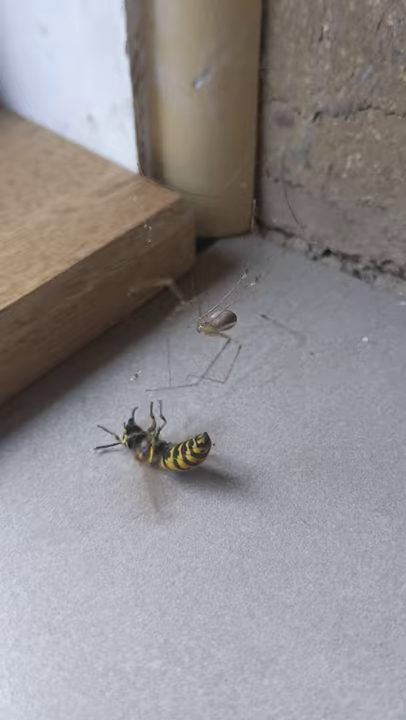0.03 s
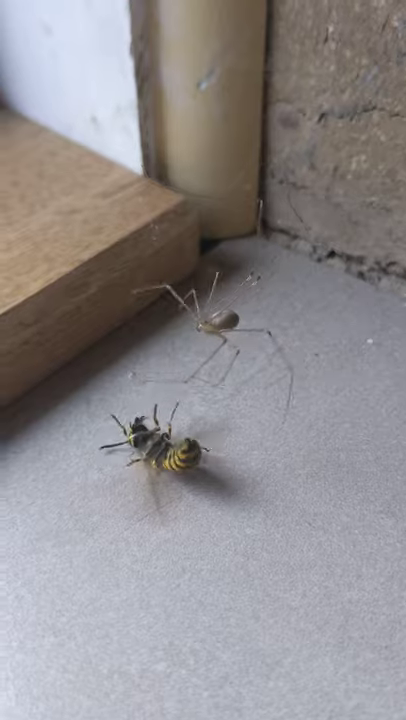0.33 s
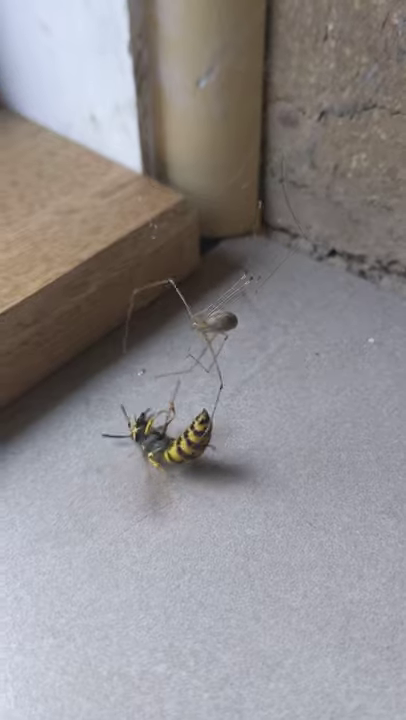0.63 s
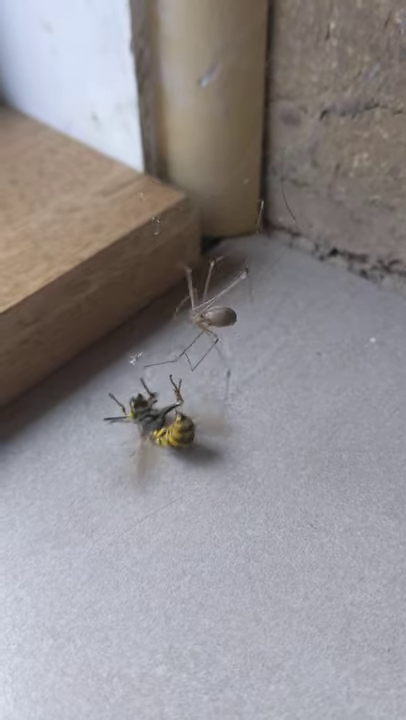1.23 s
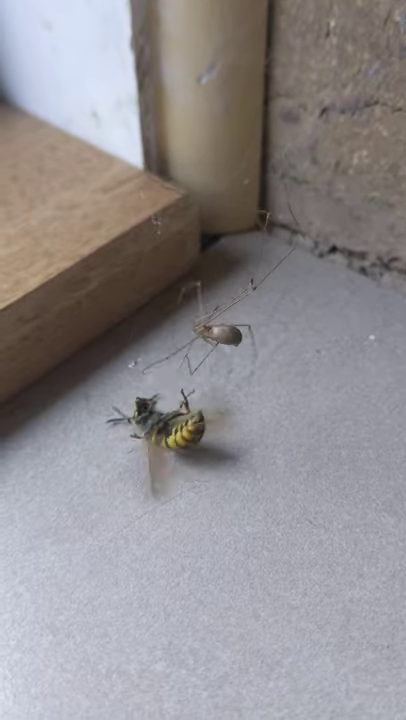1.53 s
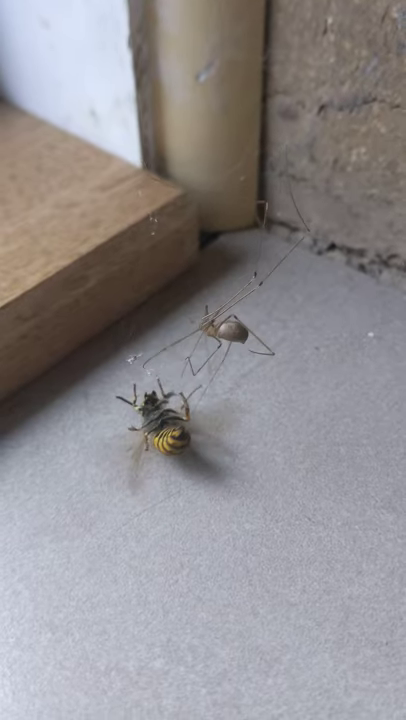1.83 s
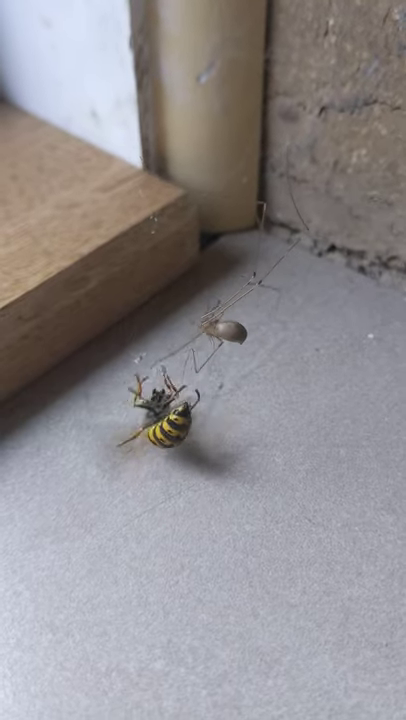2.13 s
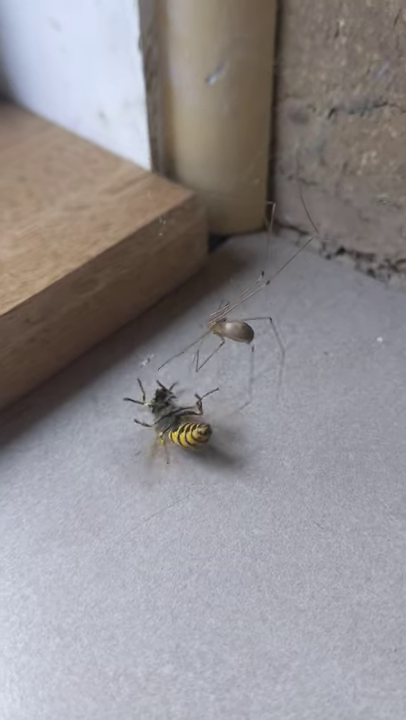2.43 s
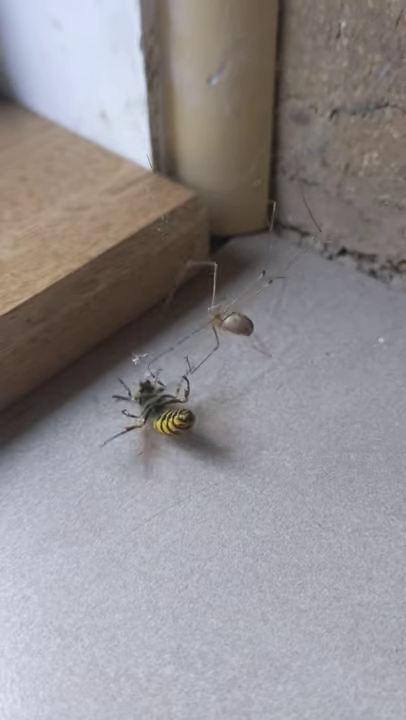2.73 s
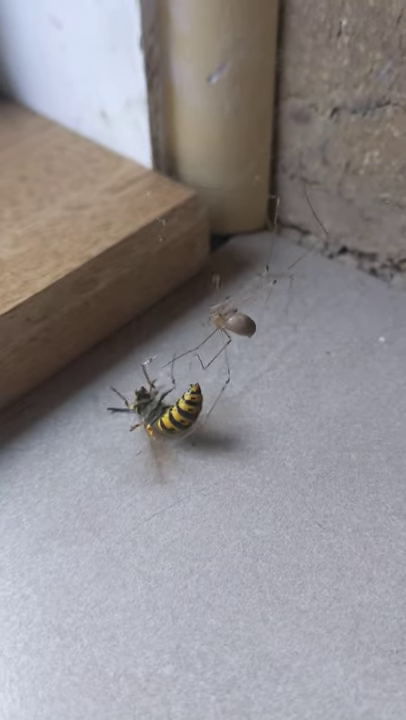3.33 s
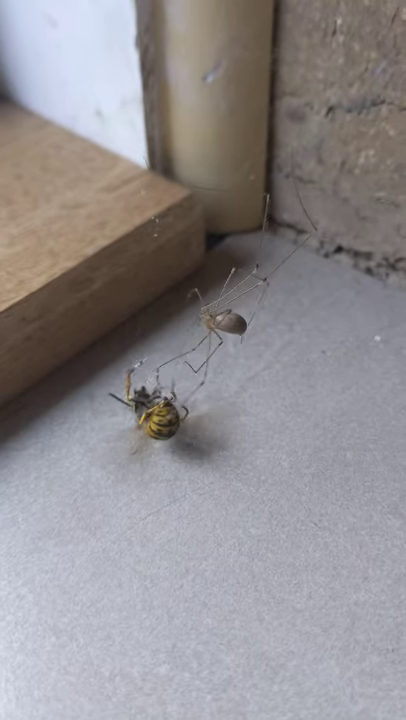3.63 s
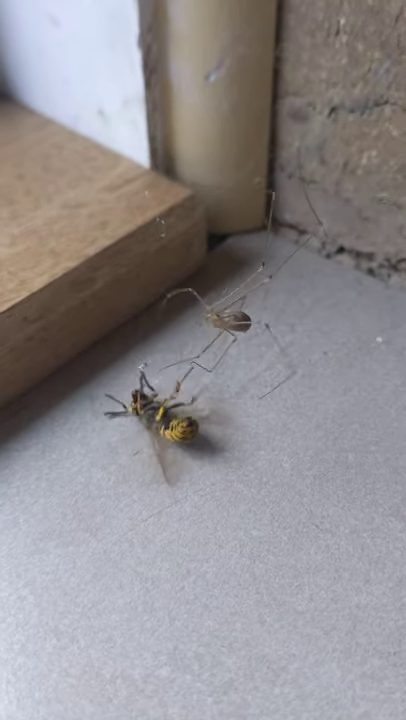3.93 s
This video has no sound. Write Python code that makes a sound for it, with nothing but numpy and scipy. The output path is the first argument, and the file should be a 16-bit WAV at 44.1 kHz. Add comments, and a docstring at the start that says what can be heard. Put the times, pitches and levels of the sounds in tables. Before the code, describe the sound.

A wasp's wings buzz and rattle dryly against a hard floor, close up.

```python
"""A wasp on its back on a hard floor, caught in a spider's threads, beats its wings in fits.
Each beat slaps and scuffs the floor, with a lighter touch on the way back: a dry, gritty rattle
whose colour shifts as the wasp twists. The struck wing rings, the body knocks and rubs,
and puffs of air add a soft low flutter. It is heard close up, in the corner of a quiet room
with a low rumble, a hum and a faint fading hiss."""
import sys
import numpy as np
from scipy import signal
from scipy.fft import rfft, irfft
from scipy.io import wavfile

SR = 44100
rng = np.random.default_rng(int(sys.argv[2]) if len(sys.argv) > 2 else 0)


def wav_record(signal):
    """Record a signal, one row per channel, as 16-bit PCM in the file named by sys.argv[1]."""
    frames = np.transpose(np.atleast_2d(signal))
    bounded = np.clip(frames, -1, 1)
    # unit amplitude maps onto the largest positive 16-bit level
    quanta = np.round(bounded * 32767).astype(np.int16)
    wavfile.write(sys.argv[1], SR, quanta)


N = 176400
T = np.arange(N) / SR

# Speed of the wingbeat: time_s, rate_hz
BEAT_RATE = [(0.0, 56), (0.02, 47.02), (0.099, 78.99), (0.269, 47.62), (0.319, 66.86), (0.348, 72.74),
             (0.458, 68.65), (0.537, 58.93), (0.617, 72.48), (0.657, 73.15), (0.706, 63.98), (0.816, 72.12),
             (1.105, 74.36), (1.144, 77.39), (1.224, 74.95), (1.333, 79.71), (1.483, 65.75), (1.592, 57.54),
             (1.642, 47.56), (1.701, 66.56), (1.771, 58.44), (1.871, 69.15), (1.92, 65.4), (1.98, 69.09),
             (2.08, 66.51), (2.149, 58.76), (2.199, 68.4), (2.309, 60.66), (2.388, 67.91), (2.438, 60.2),
             (2.567, 68.75), (2.677, 59.0), (2.736, 70.88), (2.945, 49.51), (3.114, 47.63), (3.154, 52.7),
             (3.214, 46.41), (3.274, 64.94), (3.403, 55.68), (3.592, 63.77), (3.721, 52.84), (3.791, 61.67),
             (3.821, 67.09), (4.0, 48.9)]
# How hard the wings hit the floor: time_s, level_db
BEAT_FORCE = [(0.0, -53.5), (0.05, -38), (0.135, -34), (0.226, -58), (0.27, -62), (0.31, -41.5),
              (0.39, -34.5), (0.442, -36), (0.496, -42), (0.551, -41), (0.595, -37.5), (0.841, -37.5),
              (0.929, -35), (1.081, -34), (1.179, -30), (1.285, -31.5), (1.479, -37), (1.63, -36.5),
              (1.76, -39), (1.96, -35.5), (2.2, -35), (2.275, -33), (2.34, -36.5), (2.561, -33),
              (2.619, -35), (2.87, -32.5), (3.09, -39.5), (3.189, -33.5), (3.307, -38), (3.321, -33.5),
              (3.504, -34.5), (4.0, -34)]
# Back stroke against the slap: time_s, gain_db
BACK_STROKE_LEVEL = [(1.3, -9.5), (1.98, -6), (2.3, -8.5), (3.5, -13)]
# Colour of the rattle on each side: frequency_hz, gain_db
RATTLE_EQ_LEFT = [(300, -49), (1000, -4), (1550, -16), (2500, -25.5), (4000, -18), (4650, -10.5),
                  (5300, -19.5), (6200, 1), (6600, -8), (7500, -2.5), (8400, -10), (9500, -5.5),
                  (10600, -22), (11900, -10), (12600, -30), (15700, -17)]
RATTLE_EQ_RIGHT = [(300, -36), (1000, -24), (1550, -16), (4200, -15.5), (4650, -7), (5500, -11.5),
                   (6890, -7.4), (7750, -15), (8610, -10.5), (10250, -5.8), (11500, -7.5), (11970, -5.5),
                   (12400, -8.5), (12830, -4.8), (13300, -9), (13780, -2.5), (14150, -7.5), (14640, -2.8),
                   (15100, -7.5), (15330, -4.5), (15680, -6.5)]
# Ride on the rattle's lower treble: time_s, gain_db
LOWER_TREBLE_GAIN = [(.1, 0), (.4, 3), (.9, -2), (1.25, 2), (1.5, -3), (1.85, -1), (2.5, -1), (2.8, 0),
                     (3.1, -3), (3.45, 1)]
# Tilt of the rattle's top against its middle treble: time_s, tilt_db
TREBLE_TILT = [(0, 8), (.47, 6.5), (.7, 7.5), (.88, 1), (.98, 4.5), (1.15, 2.5), (1.62, 3), (1.85, 0),
               (2.0, 0), (2.3, -0.5), (2.62, -1.5), (3.1, 1.5), (4, 1)]
# Narrow sizzle that slides as the wing bends: time_s, gain_db, centre_hz
SIZZLE_BAND = [(.6, -2.5, 10700), (1.0, 5, 10300), (1.55, 2, 10150), (1.8, 3.5, 11100), (1.98, 7.5, 10900),
               (2.13, 0.5, 10800), (2.3, 6.5, 10600), (2.85, 3, 10150), (3.1, 1.5, 9100),
               (3.45, 0.5, 10500), (4, 5.5, 10500)]
# A focused whine, a thin high shimmer and a hollow below the whine: time_s, gain_db
WHINE_GAIN = [(1.3, 5), (1.56, 8.5), (1.76, -0.5), (2.3, -3), (2.62, 10), (2.8, -0.5), (3.0, 4), (3.6, 1.5)]
SHIMMER_GAIN = [(1.8, -3), (2.0, 1), (2.28, 9), (2.5, 1), (3.05, -3.5), (3.4, -6)]
HOLLOW_GAIN = [(2.9, 2.5), (3.4, -12), (3.8, -1)]
# Modes of the body knocking on the floor: pitch_hz, gain_db, decay_s, gain_db_per_beat_hz
BODY_MODES = [(870, -30.5, 0.00045, 0.67), (2700, -20, 0.00074, -0.53)]
# Colour of wings and body rubbing the floor: frequency_hz, gain_db
RUB_EQ = [(300, -27), (700, -7), (1350, -5), (1950, -11), (2500, -5.5), (3300, -5), (5000, -10.5),
          (9000, -28.5)]
# Swells of the rub: time_s, gain_db
RUB_SWELL = [(0, -4.5), (.12, 1.5), (.25, -7), (.38, 0), (.74, -1), (.83, 0.5), (.95, -1.5), (1.2, 1),
             (1.6, -0.5), (1.83, 2.5), (1.97, 0.5), (2.25, 0), (2.5, -0.5), (2.83, 2.5), (3.05, -2),
             (3.33, 0), (3.74, -1), (3.85, 1.5), (4, -1)]
# Colour of the air pushed by the wings: frequency_hz, gain_db
FLUTTER_EQ = [(30, -46), (70, -4.5), (130, 2.5), (210, 1), (320, -20.5), (700, -16), (2000, -33)]
# Swells of the flutter: time_s, gain_db
FLUTTER_SWELL = [(.7, -8), (.94, 6), (1.06, -2), (1.2, 1.5), (1.33, 4.5), (1.45, -9), (1.6, 2), (1.8, 3),
                 (2.0, 6), (2.07, 4), (2.14, 8), (2.22, 7), (2.45, -3.5), (2.8, 6.5), (3.0, -0.5),
                 (3.35, 3), (3.75, -12)]
# Colour of the room's rumble: frequency_hz, gain_db
RUMBLE_EQ = [(25, -35), (48, -4), (90, -7.5), (125, 2), (200, -1), (285, -1.5), (330, -4), (500, -13),
             (1000, -19), (2000, -15.5), (4000, -16.5), (16000, -23)]
# How alike the rumble is on the two sides: frequency_hz, correlation
RUMBLE_LIKENESS = [(50, 0.15), (150, 0.58), (280, 0.92), (500, 0.61), (1200, 0.05), (16000, 0.26)]
# Steady tones of the hum: pitch_hz, level_db
HUM_TONES = [(122, -80.5), (200, -74), (296, -74), (347, -78.5), (499, -86.5)]
# Colour of the narrow hiss: frequency_hz, gain_db
HISS_EQ = [(800, -22), (1150, -18), (1300, -5), (1600, -9), (1900, -16), (3500, -43)]

USUAL_BEAT_HZ = 62
TOUCH_ATTACK_S, TOUCH_HOLD_S, KNOCK_DELAY_S = .00024, .00061, .0009
LEFT_LAG_SAMPLES = int(.00046 * SR)   # the wasp is heard on the right first
SHARED_POWER = .41   # part of the friction noise common to both sides


def wingbeats():
    """The wings beat in fits, never quite evenly: time, rate and force of every beat."""
    cycles = .225 + np.cumsum(at_time(BEAT_RATE, T)) / SR
    beat_s = np.interp(np.arange(1, int(cycles[-1]) + 1), cycles, T)
    jitter_s, jitter_db = (rng.standard_normal((len(beat_s), 2)) * [.00012, .6]).T
    return beat_s + jitter_s, at_time(BEAT_RATE, beat_s), at_time(BEAT_FORCE, beat_s) + jitter_db


def wing_rattle(beat_s, rate_hz, force_db):
    """The wing brushes the floor, slaps with a snap, scuffs on and touches back: four bursts of grit."""
    jitter_s = .0003 * rng.standard_normal((len(beat_s), 3)).T
    jitter_db = 1.5 * rng.standard_normal((len(beat_s), 3)).T
    light_db = force_db + .6 * np.minimum(rate_hz - USUAL_BEAT_HZ, 0)   # slow beats barely graze
    back_db = light_db + at_time(BACK_STROKE_LEVEL, beat_s)
    slap = touches(beat_s, force_db, decay_s=.0011)
    brush = touches(beat_s - .003 + jitter_s[0], light_db - 15 + jitter_db[0], decay_s=.002)
    scuff = touches(beat_s + .00084 + jitter_s[1], light_db - 12 + jitter_db[1], decay_s=.0018)
    back = touches(beat_s + .33 / rate_hz + jitter_s[2], back_db + jitter_db[2], decay_s=.0019)
    grit = unit_rms(rng.choice([-1, 1], (3, N)) * from_db(.7 * rng.standard_normal((3, N))))
    snap_db = force_db + 9.5 + rng.standard_normal(len(beat_s))
    snap = clicks(beat_s + TOUCH_ATTACK_S / 2, from_db(snap_db))
    left, right = snap + np.sqrt(slap + brush + scuff + back) * spread(grit)
    left = from_db(1) * np.roll(left, LEFT_LAG_SAMPLES)
    return from_db(7) * np.stack([colour(left, RATTLE_EQ_LEFT), colour(right, RATTLE_EQ_RIGHT)])


def wing_ring(beat_s, rate_hz, force_db):
    """Each slap rings the wing for a few cycles, lower when it beats faster and bends further."""
    t, wing = T[:N // 400], np.zeros(N + SR)
    rise_s, decay_s = .00005, .00058
    pitch_hz = 6820 - 28 * (rate_hz - USUAL_BEAT_HZ) + 190 * rng.standard_normal(len(beat_s))
    envelope = (1 - np.exp(-t / rise_s)) * np.exp(-t / decay_s)
    for start, hz, gain in zip((beat_s * SR).astype(int), pitch_hz, from_db(force_db + 5)):
        wing[start:start + len(t)] += gain * envelope * np.sin(2 * np.pi * hz * t)
    return np.stack([np.roll(wing[:N], LEFT_LAG_SAMPLES), from_db(-6.5) * wing[:N]])


def twist(wings):
    """A moving EQ: the wings' bands and resonances shift as the wasp turns, over a fixed low cut."""
    low_cut_hz, lower_treble_hz, top_hz = 3630, 5840, 9500
    hz, time_s, frames = signal.stft(wings, SR, nperseg=256, noverlap=192)
    hz = hz[:, None]
    low = 1 / (1 + (hz / lower_treble_hz) ** 24)
    top = 1 - 1 / (1 + (hz / top_hz) ** 8)
    gain_db = low * at_time(LOWER_TREBLE_GAIN, time_s)
    gain_db += (1 - low) * (top - .5) * at_time(TREBLE_TILT, time_s)
    sizzle_s, sizzle_db, sizzle_hz = np.transpose(SIZZLE_BAND)
    for bell_db, centre_hz, width_hz in [
            (np.interp(time_s, sizzle_s, sizzle_db), np.interp(time_s, sizzle_s, sizzle_hz), 630),
            (at_time(WHINE_GAIN, time_s), 6900, 260),
            (at_time(SHIMMER_GAIN, time_s), 13780, 250),
            (at_time(HOLLOW_GAIN, time_s), 5400, 380)]:
        gain_db += bell_db * np.exp(-((hz - centre_hz) / width_hz) ** 2)
    low_cut = hz ** 2 / np.hypot(hz ** 2, low_cut_hz ** 2)
    return signal.istft(frames * from_db(gain_db) * low_cut, SR, nperseg=256, noverlap=192)[1][:, :N]


def body_knock(beat_s, rate_hz, force_db):
    """The body hits the floor just after each slap: hollow on fast beats, a dry tick on slow ones."""
    t, body = T[:N // 400], 0
    for hz, gain_db, decay_s, db_per_beat_hz in BODY_MODES:
        blow_db = force_db + gain_db + db_per_beat_hz * (rate_hz - USUAL_BEAT_HZ)
        blows = clicks(beat_s + KNOCK_DELAY_S, from_db(blow_db))
        mode = np.exp(-t / decay_s) * np.sin(2 * np.pi * hz * t)
        body = body + signal.fftconvolve(blows, mode)[:N]
    return np.stack([np.roll(body, LEFT_LAG_SAMPLES), body])


def floor_rub(beat_s):
    """Wings and body scrape dully on each beat, over scrabbling that swells in the hardest struggles."""
    left, right = spread(rng.standard_normal((3, N)))
    scrape_power = touches(beat_s + KNOCK_DELAY_S, at_time(RUB_SWELL, beat_s), decay_s=.0022)
    scrapes = from_db(-65) * unit_rms(np.sqrt(scrape_power))
    scrabble = from_db(-63.5 + 2 * at_time(RUB_SWELL, T))
    friction = np.stack([colour(np.roll(left, LEFT_LAG_SAMPLES), RUB_EQ), colour(right, RUB_EQ)])
    return np.hypot(scrapes, scrabble) * unit_rms(friction)


def air_flutter(beat_s):
    """Each beat pushes one soft, uneven puff of air."""
    wobble = 1 + .56 * rng.standard_normal(len(beat_s))
    puffs = clicks(beat_s, from_db(at_time(FLUTTER_SWELL, beat_s)) * wobble)
    return from_db(-67.5) * unit_rms(colour(puffs, FLUTTER_EQ))


def room_reverb(wasp, level_db=-14.5, t60_s=.11, predelay_s=.002):
    """The room answers with a short diffuse tail, different on each side."""
    t = T[:N // 10]
    tail = rng.standard_normal((2, len(t))) * from_db(-60 * t / t60_s) * (t > predelay_s)
    tail /= np.sqrt(np.sum(tail ** 2, axis=1, keepdims=True))
    return from_db(level_db) * signal.fftconvolve(wasp, tail, axes=1)[:, :N]


def room_tone(hiss_fade_db_per_s=15):
    """A bed of low rumble and steady hum, with a faint hiss that fades from the start."""
    mid, side, hiss_left, hiss_right = rfft(rng.standard_normal((4, N)))
    alike = at_bins(RUMBLE_LIKENESS)
    stereo = np.sqrt(1 + alike) * mid + np.sqrt(1 - alike) * side * [[1], [-1]]
    rumble = from_db(-61.5) * unit_rms(irfft(stereo * from_db(at_bins(RUMBLE_EQ)), N))
    hum = sum(np.sqrt(2) * from_db(db) * np.sin(2 * np.pi * (hz * T + rng.random()))
              for hz, db in HUM_TONES)
    hiss = unit_rms(irfft(np.stack([hiss_left, hiss_right]) * from_db(at_bins(HISS_EQ)), N))
    return rumble + hum + hiss * from_db(-61 - hiss_fade_db_per_s * T)


def touches(start_s, level_db, decay_s):
    """Power envelope of contacts that rise quickly, hold for an instant and die away."""
    t = T[:N // 100]
    attack = np.minimum(t / TOUCH_ATTACK_S, 1)
    release = np.exp(-np.maximum(t - TOUCH_ATTACK_S - TOUCH_HOLD_S, 0) / decay_s)
    hits = clicks(start_s, from_db(level_db) ** 2)
    return np.maximum(signal.fftconvolve(hits, (attack * release) ** 2)[:N], 0)


def clicks(start_s, gain):
    """One impulse at each start time."""
    track, inside = np.zeros(N), (start_s >= 0) & (start_s < T[-1])
    np.add.at(track, (start_s[inside] * SR).astype(int), gain[inside])
    return track


def spread(noise):
    """Three noises to stereo: the first in the centre, the others one to a side."""
    return np.sqrt(SHARED_POWER) * noise[0] + np.sqrt(1 - SHARED_POWER) * noise[1:]


def colour(sound, eq):
    """Minimum-phase EQ, so nothing rings ahead of an attack."""
    cepstrum = irfft(np.log(from_db(at_bins(eq))), N)
    cepstrum[1:N // 2] *= 2
    cepstrum[N // 2 + 1:] = 0
    impulse = irfft(np.exp(rfft(cepstrum)), N)[:N // 20]
    return signal.fftconvolve(sound, impulse)[:N]


def at_time(curve, time_s):
    """Read an automation curve at the given times."""
    return np.interp(time_s, *np.transpose(curve))


def at_bins(curve):
    """Read a curve at every FFT bin, on a log frequency scale."""
    hz, value = np.transpose(curve)
    return np.interp(np.log(np.fft.rfftfreq(N, 1 / SR) + 1), np.log(hz), value)


def from_db(db):
    """Decibels to gain."""
    return 10 ** (np.asarray(db) / 20)


def unit_rms(sound):
    """Scale to an rms of one."""
    return sound / np.sqrt(np.mean(sound ** 2) + 1e-20)


def scene():
    """The wasp and its reverb, over flutter and room tone that lean slightly left."""
    beat_s, rate_hz, force_db = wingbeats()
    wings = wing_rattle(beat_s, rate_hz, force_db) + wing_ring(beat_s, rate_hz, force_db)
    wasp = twist(wings) + body_knock(beat_s, rate_hz, force_db) + floor_rub(beat_s)
    lean_left = from_db([[.75], [-.75]])
    return wasp + room_reverb(wasp) + (air_flutter(beat_s) + room_tone()) * lean_left


def record(dry):
    """A steep high cut on the mix, 70 dB down from 16.5 kHz."""
    return signal.sosfilt(signal.cheby2(16, 70, 16500, fs=SR, output="sos"), dry)


dry = scene()
out = record(dry)
wav_record(out)
```